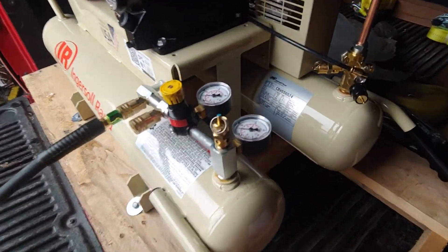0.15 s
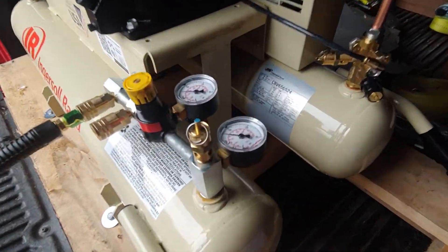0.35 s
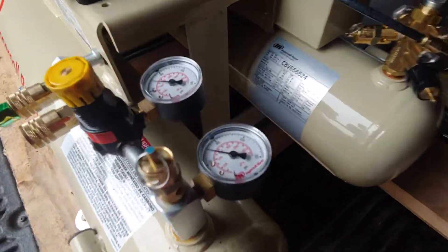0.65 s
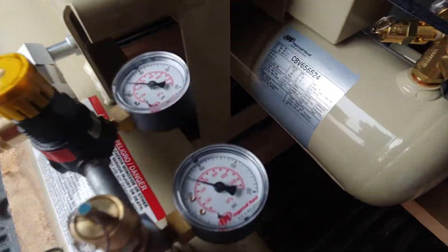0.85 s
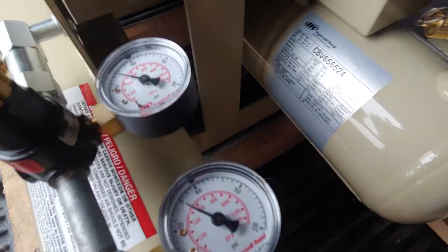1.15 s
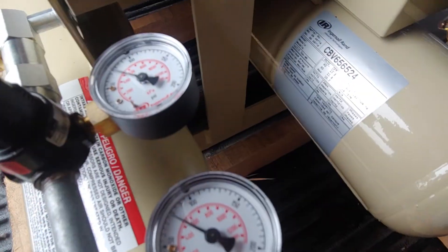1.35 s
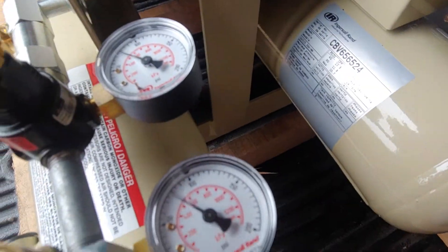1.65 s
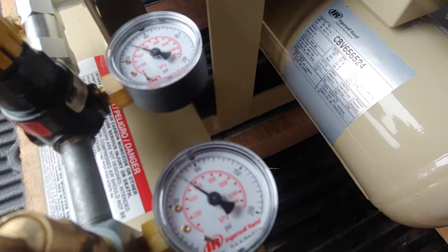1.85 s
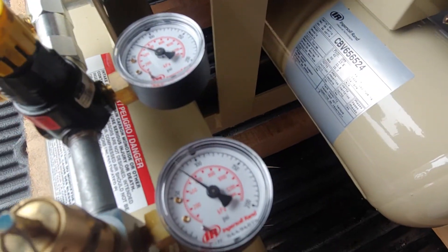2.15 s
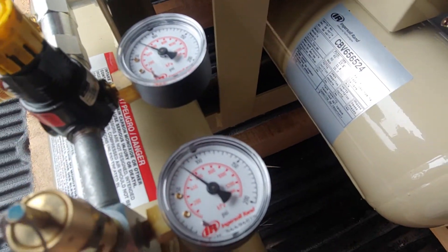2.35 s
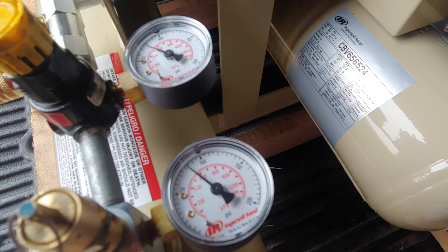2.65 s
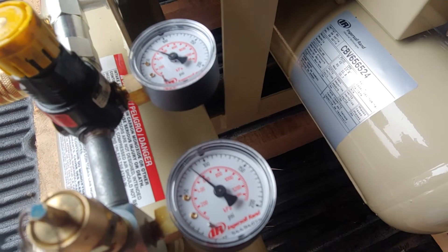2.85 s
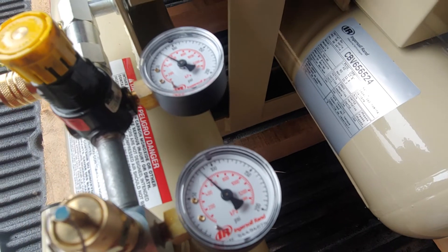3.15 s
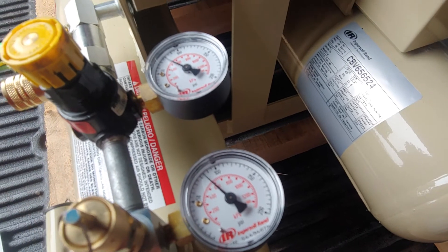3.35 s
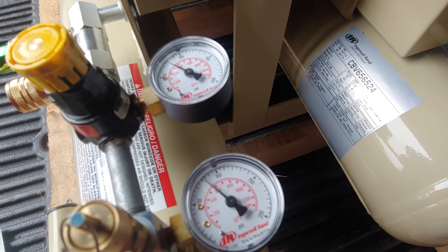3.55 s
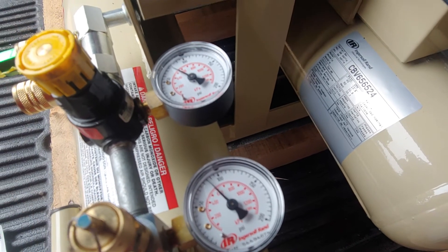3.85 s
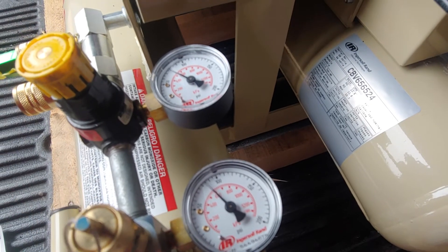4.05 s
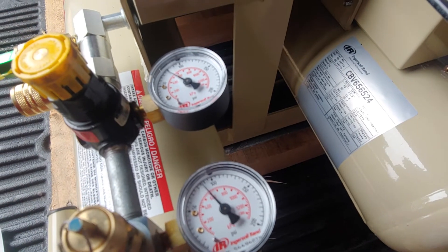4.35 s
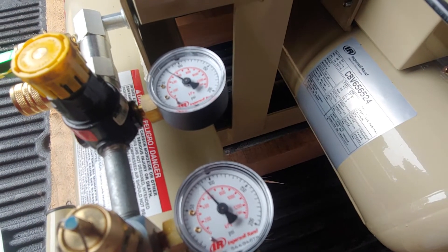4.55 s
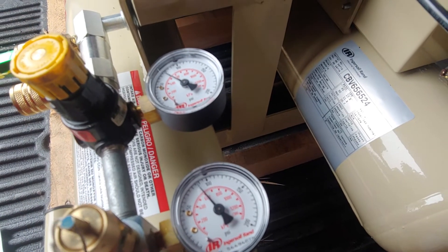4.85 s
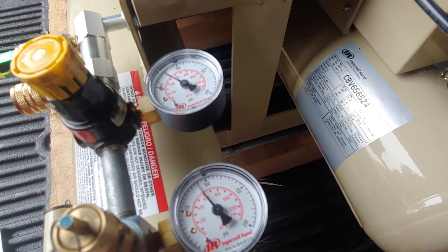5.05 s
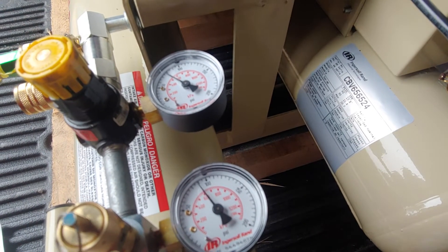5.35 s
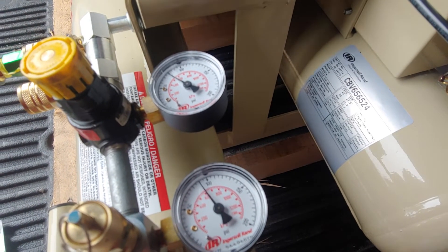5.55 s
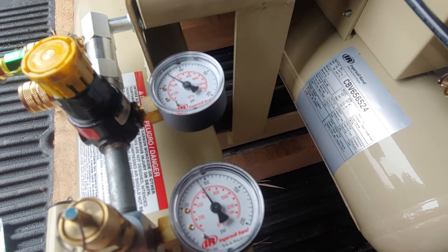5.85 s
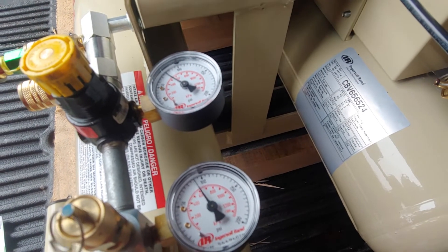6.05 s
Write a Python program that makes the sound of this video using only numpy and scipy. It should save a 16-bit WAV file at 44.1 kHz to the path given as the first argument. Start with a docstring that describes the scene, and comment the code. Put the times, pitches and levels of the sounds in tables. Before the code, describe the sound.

A single-cylinder petrol engine runs at constant speed very close by, its deep buzzing exhaust mixed with the quicker beating throb of a belt-driven air pump. Valve claps, piston knocks, loose rattles and a rush of cooling air form a dense metallic layer. The handheld stereo microphone moves in close during the first second or so, then draws back slightly, changing the treble colour. Short hard reflections suggest a shed.

```python
"""In a shed, close by, a single-cylinder petrol engine belt-drives a two-piston air pump.
Exhaust and pump drones are sums of sines on the firing rate, the pump rate and their combinations,
so the two beat against each other. Valve gear, piston knocks, cooling air and loose fittings are
noise and struck modes, echoed by the shed and coloured by steel tanks; thin panels sing on top."""
import sys
import numpy as np
from scipy import signal
from scipy.fft import rfft, irfft
from scipy.io import wavfile
from scipy.ndimage import uniform_filter1d, minimum_filter1d

SR = 44100
rng = np.random.default_rng(int(sys.argv[2]) if len(sys.argv) > 2 else 0)


def wav_record(signal):
    """Record a signal, one row per channel, as 16-bit PCM in the file named by sys.argv[1]."""
    frames = np.transpose(np.atleast_2d(signal))
    bounded = np.clip(frames, -1, 1)
    # unit amplitude maps onto the largest positive 16-bit level
    quanta = np.round(bounded * 32767).astype(np.int16)
    wavfile.write(sys.argv[1], SR, quanta)


N = 274302
TIME = np.arange(N) / SR
HZ = np.fft.rfftfreq(N, 1 / SR)
LEFT_LAG_S = .00014


def amp(db):
    """Decibels to gain."""
    return 10 ** (np.asarray(db) / 20)


def evened(x):
    """Scales to rms 1."""
    return x / np.sqrt(np.mean(x ** 2) + 1e-20)


def curve(points):
    """A (time, value) table joined by straight lines over TIME."""
    return np.interp(TIME, *np.transpose(points))


def spectrum(points):
    """A (frequency, value) table joined by straight lines over log frequency."""
    hz, value = np.transpose(points)
    return np.interp(np.log(HZ + 1), np.log(hz), value)


def bell(offset, width):
    """A bump of height 1; width is full width at half height."""
    return .5 ** ((2 * offset / width) ** 2)


def wander(rate_hz):
    """Slow noise of rms 1, its spectrum halved at rate_hz."""
    return evened(irfft(rfft(rng.standard_normal(N)) * bell(HZ, 2 * rate_hz), N))


def tone(turns, db):
    """A sine of the given rms level."""
    return np.sqrt(2) * amp(db) * np.cos(2 * np.pi * turns)


def shade(x, hz, width_hz, db):
    """Raises or lowers one band along a gain curve."""
    band = irfft(rfft(x) * bell(HZ - hz, width_hz), N)
    return x + (amp(db) - 1) * band


def rock_turns(cycles, pump_turns):
    """Phase of pump strokes (two a turn) against firings, about 13 rounds a second."""
    return 2 * pump_turns - cycles


def slip_turns(cycles, pump_turns):
    """Phase of three firings against four pump turns (eight strokes), one round about every 0.6 s."""
    return 3 * cycles - 4 * pump_turns


# brief changes of the jolting: (time [s], level [dB])
JOLT_BURSTS = [(.643, 4), (.736, 4), (1.409, 3.5), (1.762, 2.5), (1.975, 3), (2.055, 2), (2.201, 2),
               (2.35, 2), (2.497, 2.5), (3.5, 1), (3.62, 2), (3.83, 1), (3.91, 2.5), (4.0, -0.5), (4.26, 3),
               (4.581, 2.5), (4.638, 4.5), (5.25, 3), (5.781, 3.5)]
BURST_S = .039


def jolts(cycles, pump_turns, rock_db=.71, heave_db=.6, heave_turns=.29, chance_db=.66, chance_hz=4):
    """Frame shake as a gain: rock and heave as strokes and firings fall in and out of step."""
    rock_at, heave_at = .72, .18  # turns
    rock = np.cos(2 * np.pi * (rock_turns(cycles, pump_turns) - rock_at))
    from_heave = (slip_turns(cycles, pump_turns) - heave_at + .5) % 1 - .5
    heave = bell(from_heave, heave_turns)
    bursts = sum(db * bell(TIME - s, BURST_S) for s, db in JOLT_BURSTS)
    shake_db = rock_db * rock + heave_db * heave + chance_db * wander(chance_hz) + bursts
    return amp(shake_db - shake_db.mean())


def cooling_air(level_db=-3.5):
    """Rush of cooling air: steady white noise, independent in the two channels."""
    return amp(level_db) * rng.standard_normal((2, N))


def rattle(jolt, per_s=700, spread_db=1.5, tick_s=.0011, level_db=-7):
    """Loose fittings tick at random, more often when the frame is jolted."""
    sizes = amp(spread_db * np.minimum(rng.exponential(1, N), 4))
    ticks = sizes ** 2 * (rng.random(N) < per_s * jolt / SR)
    power = signal.lfilter([1], [1, -np.exp(-1 / (tick_s * SR))], ticks)
    return amp(level_db) * evened(np.sqrt(power) * rng.standard_normal((2, N)))


def blows(turns, table, uneven_db=2.5, jitter_ms=.3, low_hz=216):
    """Each part strikes at its place in the cycle and rings the same dense modes every time."""
    size = SR // 8
    t, hz = np.arange(size) / SR, np.fft.rfftfreq(size, 1 / SR)
    out = np.zeros((2, N))
    for place, centre_hz, half_octaves, t60_s, db in table:
        strength, late = rng.standard_normal((2, 256))
        at_s = np.interp(np.arange(256) + place, turns, TIME, right=-1) + late * jitter_ms / 1000
        inside = (at_s > 0) & (at_s < TIME[-1])
        strikes = np.zeros(N)
        strikes[(at_s[inside] * SR).astype(int)] = amp(uneven_db * strength[inside])
        band = bell(np.log2((hz + 1) / centre_hz), 2 * half_octaves)
        band = band / (1 + (low_hz / (hz + 1)) ** 10)  # low cut keeps the knocks out of the bass drone
        modes = irfft(rfft(rng.standard_normal((2, size))) * band, size)
        decay = amp(-60 * t / t60_s)
        ring = modes * decay / np.linalg.norm(decay)
        out += amp(db) * signal.oaconvolve(evened(strikes)[None], ring, axes=1)[:, :N]
    return out


# air valve claps in each pump turn, before the steel:
# (place in turn [0-1], centre [Hz], half-width [octaves], ring t60 [s], level [dB])
VALVE_CLAPS = [(.36, 410, 0.96, 0.03, -10.5), (.34, 724, 0.55, 0.025, -7), (.7, 650, 0.39, 0.015, -12.5),
               (.25, 1700, 0.67, .03, -13.5), (.77, 1780, 0.54, 0.038, -11.5)]


def pump_blows(pump_turns):
    """The pump's air valves clap at fixed places in its turn."""
    return blows(pump_turns, VALVE_CLAPS)


# valve gear and piston knocks in each engine cycle, before the steel:
# (place in cycle [0-1], centre [Hz], half-width [octaves], ring t60 [s], level [dB])
ENGINE_KNOCKS = [(0, 270, 0.95, 0.02, -12.5), (.19, 330, 0.79, 0.02, -14), (.46, 640, 0.53, 0.022, -11),
                 (.18, 1850, 0.76, 0.019, -13), (.3, 1170, 0.85, 0.029, -8.5), (.72, 1440, .6, 0.028, -12),
                 (.06, 2700, 1, 0.034, -15), (.38, 3300, 0.7, 0.051, -17.5),
                 (0.12, 8700, 0.69, 0.03, -15.5), (.55, 7600, 0.79, 0.068, -10),
                 (.69, 7000, 0.89, 0.035, -14)]


def engine_blows(cycles):
    """Valve gear and piston knock at fixed places in the engine cycle."""
    return blows(cycles, ENGINE_KNOCKS)


def clatter(cycles, pump_turns, jolt, loose_hz=1900):
    """Air, blows and rattle; only the light, treble-making parts follow the jolts."""
    noise = cooling_air() + engine_blows(cycles) + pump_blows(pump_turns) + rattle(jolt)
    light = irfft(rfft(noise) * HZ ** 2 / (HZ ** 2 + loose_hz ** 2), N)
    return noise + (jolt - 1) * light


def shed(noise, echo_db=-15, t60_s=.12):
    """Nearby walls and tanks return dense decaying reflections, different at each port."""
    t = np.arange(SR // 8) / SR
    echoes = rng.standard_normal((2, len(t))) * amp(-60 * t / t60_s) * (t > .002)
    echoes = amp(echo_db) * echoes / np.linalg.norm(echoes[0])
    return noise + signal.oaconvolve(noise, echoes, axes=1)[:, :N]


# base colour of the mechanical noise: (frequency [Hz], gain [dB per Hz])
NOISE_COLOUR = [(25, -70), (50, -52), (75, -48), (130, -42.5), (230, -43), (400, -48), (560, -47.5),
                (1000, -50.5), (2300, -52), (2700, -54), (4500, -57.5), (6500, -61), (10000, -74),
                (15500, -77.5)]
# resonances of tanks, covers and fins: (centre [Hz], width [Hz], left gain [dB], right gain [dB])
STEEL_MODES = [(780, 40, 4, 0.5), (861, 20, 6, -6), (1087, 47, 5.5, 6.5), (1175, 130, 5.5, 4.5),
               (1282, 25, 6, 3.5), (1389, 43, 5.5, 5), (1631, 32, 2.5, 6.5), (1736, 290, 2, 4.5),
               (1950, 25, 0, 4), (2140, 24, 0, 8), (2217, 47, 4, 6.5), (2350, 50, 2, 3.5),
               (2260, 860, -5.5, 3), (2510, 15, 15, -2), (2700, 88, 1, 4.5), (2890, 43, 8, 8),
               (3190, 60, 4.5, 2.5), (4100, 1400, 1.5, -1.5), (6030, 77, 8.5, 2.5), (9850, 140, 9.5, -4)]
# peaks and notch of the two microphone ports: (centre [Hz], width [Hz], left gain [dB], right gain [dB])
PORT_MODES = [(7010, 850, 1, 13), (8620, 1010, -34, -21.5), (11674, 1600, 9.5, 5.5), (15600, 4454, -2.5, 3)]
# left-right likeness: (frequency [Hz], correlation [0-1])
PORT_LIKENESS = [(60, 0.5), (150, 0.85), (300, 0.93), (640, 0.8), (1100, 0.41), (2000, .18), (3000, 0.016)]


def steel(noise):
    """Tanks and covers colour the noise; reflections make the treble unlike at the two ports."""
    left, other = rfft(noise)
    same = spectrum(PORT_LIKENESS)
    right = same * left + np.sqrt(1 - same ** 2) * other
    left = left * np.exp(-2j * np.pi * HZ * LEFT_LAG_S)
    db = spectrum(NOISE_COLOUR)
    for hz, width_hz, left_db, right_db in [*STEEL_MODES, *PORT_MODES]:
        db = db + np.array([[left_db], [right_db]]) * bell(HZ - hz, width_hz)
    return irfft(np.array([left, right]) * amp(db) * np.sqrt(SR / 2), N)


# microphone to machine: (time [s], distance [m])
MIC_DISTANCE = [(0.0, 0.64), (.45, 0.81), (.85, 0.16), (1.35, 0.086), (2.3, 0.3), (3.0, 0.31), (4.2, 0.32),
                (6.2, 0.28)]
# distance where each band is loudest: (centre [Hz], width [Hz], distance [m], rise [dB])
LOUD_SPOTS = [(643, 71, 0.76, 3.5), (1140, 190, 0.15, 2.5), (2170, 270, 0.23, 2.5), (2900, 370, 0.23, 6),
              (3980, 3400, 0.73, 2), (10000, 9900, 0.2, 3)]


def standing_waves(metal, spot_octaves=1.0):
    """Standing waves and shading make each band loudest at one microphone distance."""
    distance_m, spectra, out = curve(MIC_DISTANCE), rfft(metal), metal
    for hz, width_hz, spot_m, rise_db in LOUD_SPOTS:
        near = bell(np.log2(distance_m / spot_m), spot_octaves)
        gain = amp(rise_db * (near - near.mean()))
        out = out + (gain - 1) * irfft(spectra * bell(HZ - hz, width_hz), N)
    return out


# upper-mid band of the metal: (time [s], gain [dB])
UPPER_MID_GAIN = [(0, 1), (.5, -2.5), (1, 2), (1.6, -1.5), (2.4, 0), (3.3, 1.5), (4, 1.5), (4.8, 1.5),
                  (5.35, 2), (6.2, 2.5)]


def metal_noise(cycles, pump_turns, jolt):
    """Coloured clatter whose treble flickers by chance and whose upper mids rise and fall."""
    metal = standing_waves(steel(shed(clatter(cycles, pump_turns, jolt))))
    metal = shade(metal, hz=4200, width_hz=2600, db=.9 * wander(rate_hz=22))
    return shade(metal, hz=1900, width_hz=370, db=curve(UPPER_MID_GAIN))


# singing panels: (pitch [Hz], waver [Hz rms], place in cycle [0-1], pulsing [dB], flicker [dB],
# left gain [dB], right gain [dB])
PANEL_MODES = [(755.6, 6.96, 0.01, 2.5, 3.5, -0.5, -2.5), (1157.5, 6.98, 0.4, 3, 3.5, 2, -6.5),
               (1731, 4.94, 0.7, 1, 1.5, -10, 1.5)]
# panel levels before left and right gains: (time [s], low [dB], middle [dB], high [dB])
PANEL_LEVELS = [(0, -31, -23, -22), (.45, -25.5, -27.5, -28), (.9, -29.5, -24.5, -30),
                (1.6, -27, -24.5, -35), (2.1, -26.5, -28, -33), (2.5, -35, -26, -30), (3.0, -28, -30, -33),
                (3.7, -27, -25.5, -28.5), (4.3, -25.5, -28, -29), (4.9, -26, -26.5, -27),
                (5.4, -30, -25, -26), (6.22, -29, -30.5, -26.5)]


def panels(cycles, jolt, waver_hz=9, flicker_hz=10, follows=.2):
    """Thin covers ring at their own pitch, swelling with each firing and wavering as they shake."""
    times, *levels = np.transpose(PANEL_LEVELS)
    port_s = np.array([[LEFT_LAG_S / 2], [0]])  # the left port hears the panels slightly later
    out = np.zeros((2, N))
    for mode, level in zip(PANEL_MODES, levels):
        hz, waver, place, pulse_db, flicker_db, left_db, right_db = mode
        turns = np.cumsum(hz + waver * wander(waver_hz)) / SR
        shake_db = pulse_db * np.cos(2 * np.pi * (cycles - place)) + flicker_db * wander(flicker_hz)
        shake = evened(amp(shake_db) * jolt ** follows)
        ring = tone(turns - hz * port_s, np.interp(TIME, times, level))
        out += shake * ring * amp([[left_db], [right_db]])
    return out


# pump drone before the left-right lean: (multiple of pump turning rate, level [dB])
PUMP_ORDERS = [(2, -40.9), (3, -41.5), (4, -39), (6, -31.2), (8, -35.0), (10, -40.7), (12, -33.9),
               (14, -36.7), (16, -36.7), (18, -41.3), (20, -35.5), (22, -37.5), (24, -40.9), (25, -41.4),
               (26, -41.8), (28, -36.7), (30, -42.2), (31, -41.3), (32, -41.3), (36, -39.3), (41, -41.9)]


def pump(pump_turns, uneven=.067, jitter_turns=.0036, side_db=2.0):
    """Two pistons gulp air in turn, so the even orders lead."""
    opens, pipe_lag = .419, .0001  # turns
    angle = pump_turns - opens + jitter_turns * wander(2.8)
    drone = sum(tone(k * angle - pipe_lag * k ** 2, db) for k, db in PUMP_ORDERS)
    return drone * (1 + uneven * wander(11)) * amp([[side_db], [-side_db]])


# exhaust drone before lean and swell: (multiple of firing rate, level [dB])
EXHAUST_ORDERS = [(1, -40.9), (2, -36.2), (3, -21.4), (4, -29.9), (5, -27.1), (6, -19.9), (7, -31.5),
                  (8, -29.9), (9, -34.0), (10, -33.0), (11, -36.3), (12, -33), (13, -32.7), (14, -35.7),
                  (15, -43.6), (16, -38.3), (17, -35.1), (18, -44.0), (19, -39.5)]
# pump load swings the engine and splits its tones, before swell:
# (firing multiple, pump multiple, level [dB])
LOAD_BEATS = [(1, 5, -39.6), (2, 2, -23.8), (2, 3, -39.5), (2, 4, -38.5), (3, 2, -33.2), (4, 1, -29.7),
              (4, 2, -33.6), (6, -2, -35.2), (6, 2, -40.5), (7, 1, -38.7)]


def exhaust(cycles, pump_turns, side_db=7, chug_db=.6, chug_at=.92):
    """One puff a cycle, orders delayed by the muffler; level and timing wander."""
    opens, pipe_lag, fires, load_peak = .9, .081, .94, .83  # turns
    uneven, jitter_turns = .05, .003
    surge, surge_at, surge_top_order = .2, .71, 5
    chamber_order, chamber_width, chamber_lag = 4, 1.3, .26  # orders, orders, turns
    angle = cycles + jitter_turns * wander(19)
    # bass swells as firings and pump strokes drift in and out of step
    swell = surge * np.cos(2 * np.pi * (slip_turns(cycles, pump_turns) - surge_at))
    drone = np.zeros((2, N))
    for k, db in EXHAUST_ORDERS:
        lean_db = np.array([[1], [-1]]) * side_db / max(k, 3)  # lowest orders lean most to the left
        # the muffler's chamber holds back its own note
        lag = pipe_lag * k ** 2 + chamber_lag * bell(k - chamber_order, chamber_width)
        order = tone(k * (angle - opens) - lag, db)
        drone += order * (1 + swell * (k <= surge_top_order)) * amp(lean_db)
    beats = sum(tone(k * (angle - fires) + m * (pump_turns - load_peak), db) for k, m, db in LOAD_BEATS)
    # thump as each pump stroke meets a firing
    chug = chug_db * np.cos(2 * np.pi * (rock_turns(cycles, pump_turns) - chug_at))
    drone = shade(drone + beats * (1 + swell), hz=172, width_hz=76, db=chug)
    return drone * (1 + uneven * wander(5.6))


# engine speed, two crank turns a firing: (time [s], firing rate [Hz])
FIRING_RATE = [(0.0, 28.58), (0.55, 28.61), (0.95, 28.45), (1.7, 28.63), (2.2, 28.52), (2.75, 28.55),
               (3.1, 28.37), (3.7, 28.56), (4.5, 28.55), (5.3, 28.6), (5.8, 28.49), (6.22, 28.61)]
BELT_RATIO = .7362  # pump turns per firing


def scene():
    """Engine speed drives everything, the belt turns the pump; the low mids dip briefly, once."""
    cycles = np.cumsum(curve(FIRING_RATE)) / SR
    pump_turns = BELT_RATIO * cycles
    jolt = jolts(cycles, pump_turns)
    metal = metal_noise(cycles, pump_turns, jolt)
    machine = metal + panels(cycles, jolt) + pump(pump_turns) + exhaust(cycles, pump_turns)
    dip_at_s, dip_s, dip_db = 1.995, .036, -9
    return shade(machine, hz=370, width_hz=320, db=dip_db * bell(TIME - dip_at_s, dip_s))


def record(dry, ceiling=.93, size=160, edge_hz=15800):
    """A quick limiter (size in samples) holds down the highest peaks; then a low-pass."""
    allowed = np.minimum(1, ceiling / (abs(dry) + 1e-9))
    held = minimum_filter1d(allowed, size=size, axis=1)
    limited = dry * uniform_filter1d(held, size=size, axis=1)
    low_pass = signal.firwin(1023, edge_hz, window=("kaiser", 9), fs=SR)
    return signal.oaconvolve(limited, low_pass[None], "same")


dry = scene()
out = record(dry)
wav_record(out)
```